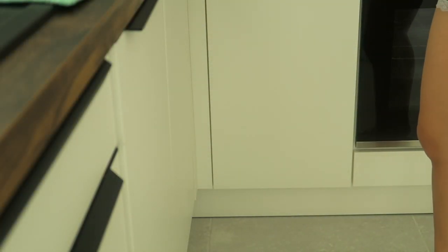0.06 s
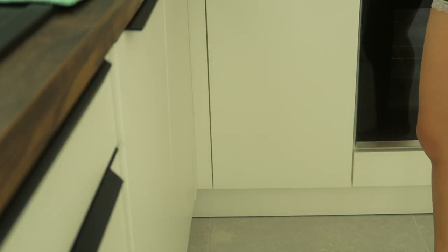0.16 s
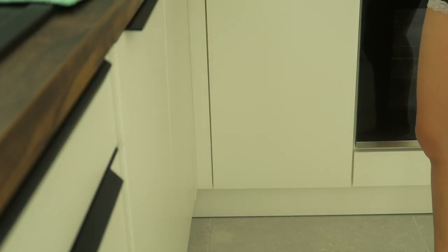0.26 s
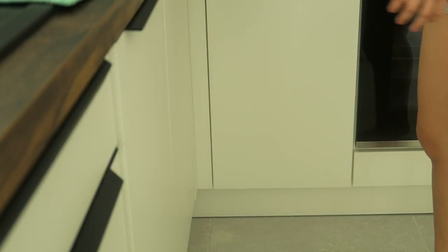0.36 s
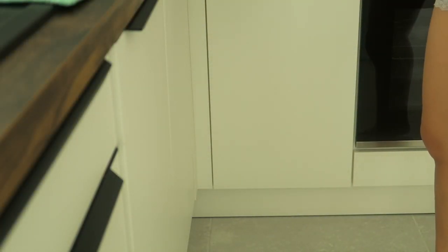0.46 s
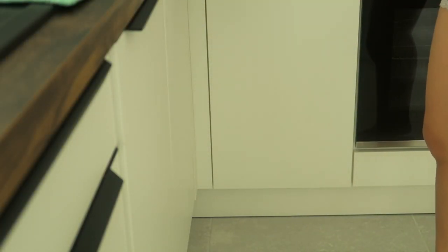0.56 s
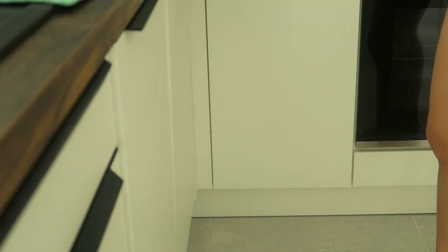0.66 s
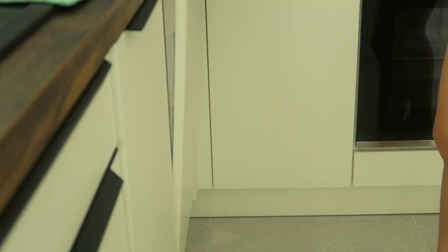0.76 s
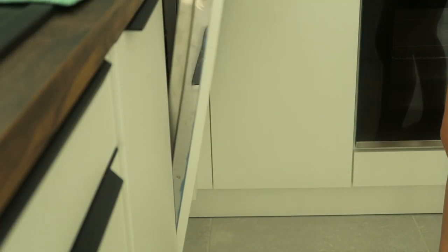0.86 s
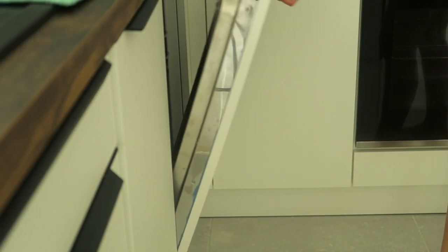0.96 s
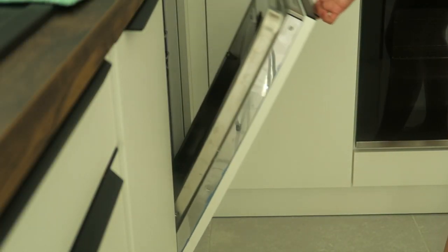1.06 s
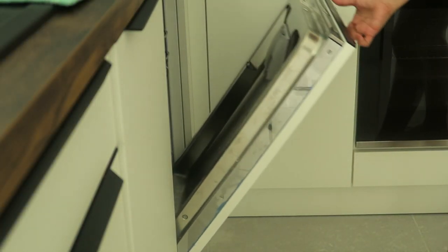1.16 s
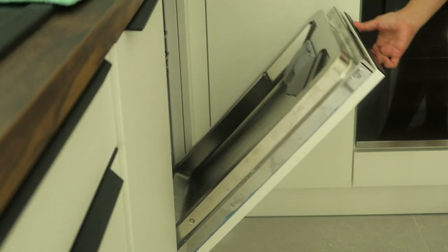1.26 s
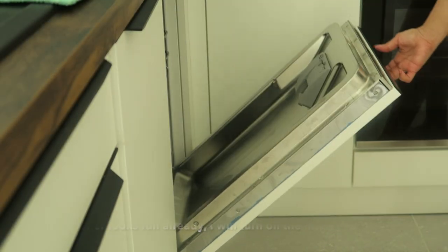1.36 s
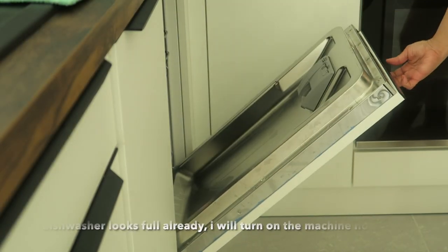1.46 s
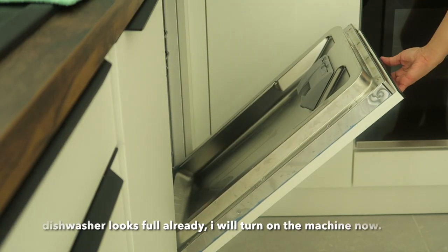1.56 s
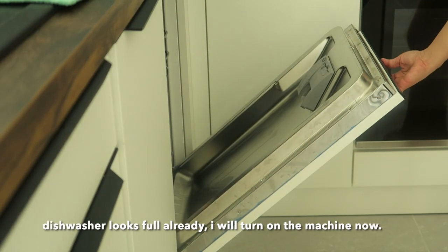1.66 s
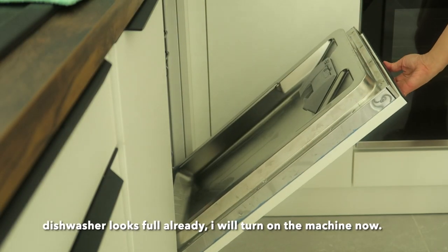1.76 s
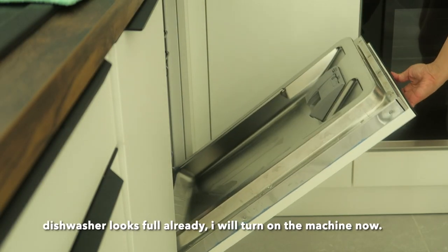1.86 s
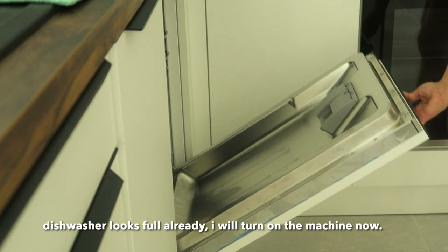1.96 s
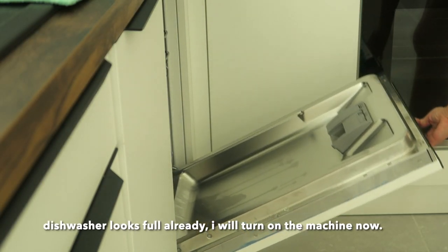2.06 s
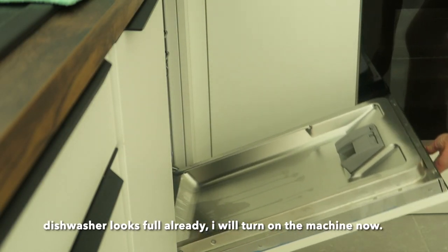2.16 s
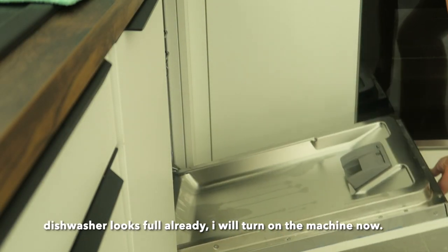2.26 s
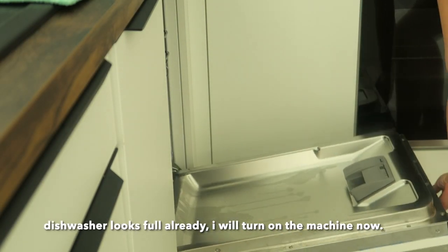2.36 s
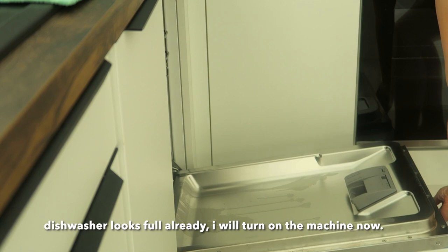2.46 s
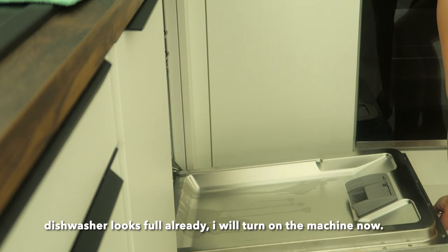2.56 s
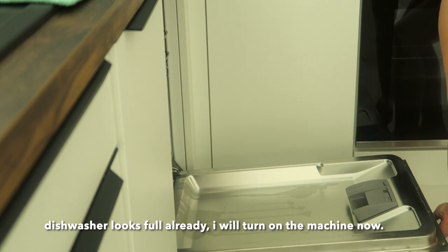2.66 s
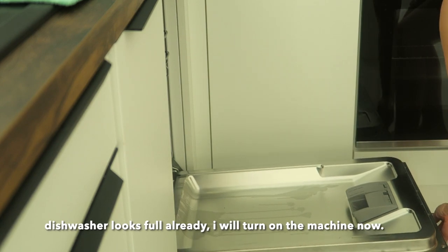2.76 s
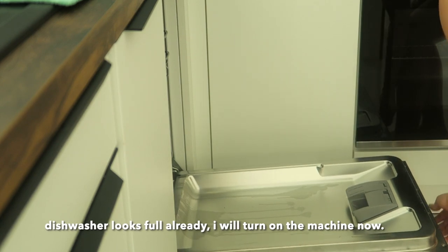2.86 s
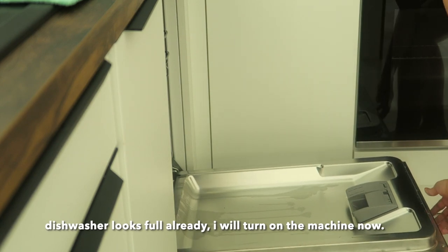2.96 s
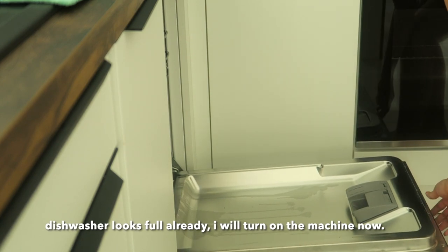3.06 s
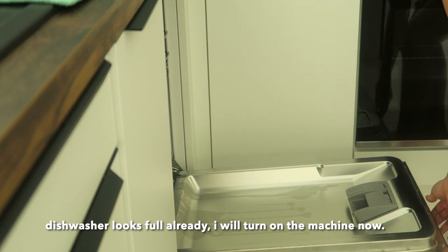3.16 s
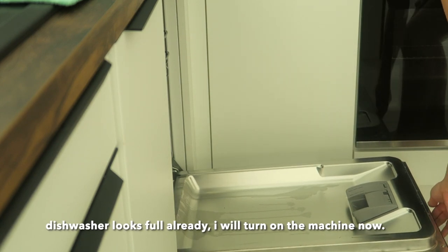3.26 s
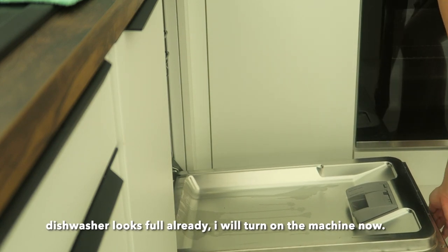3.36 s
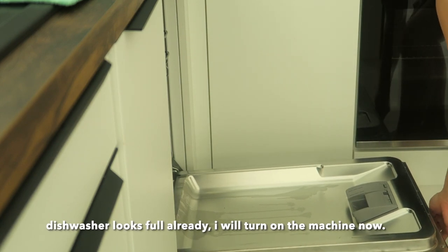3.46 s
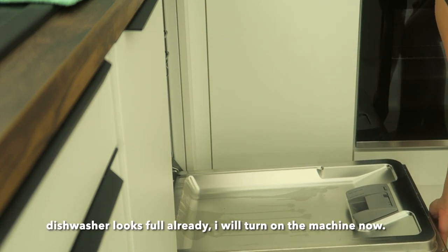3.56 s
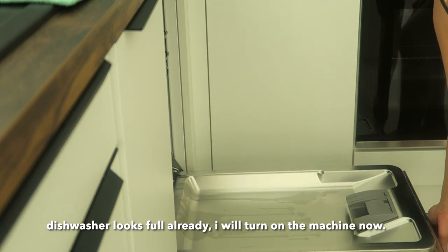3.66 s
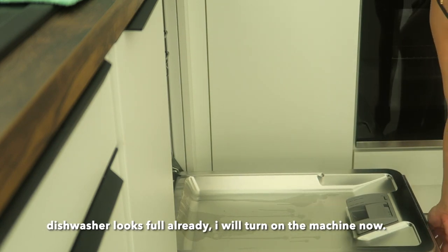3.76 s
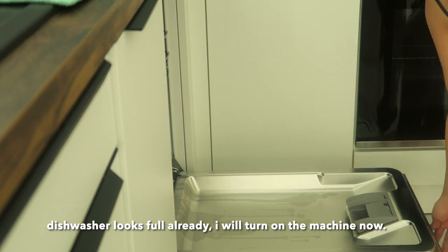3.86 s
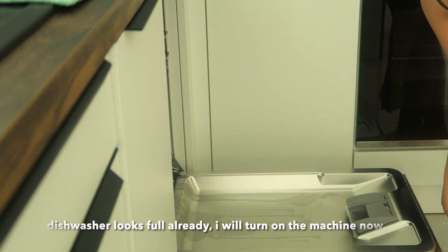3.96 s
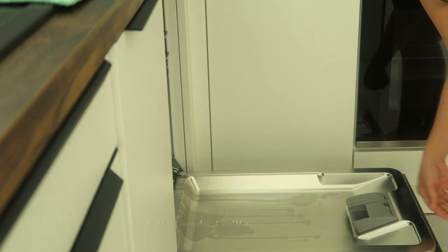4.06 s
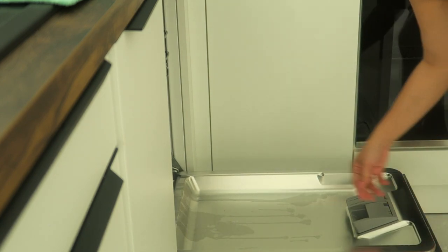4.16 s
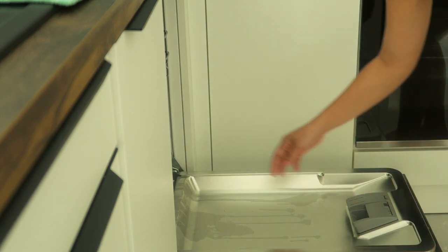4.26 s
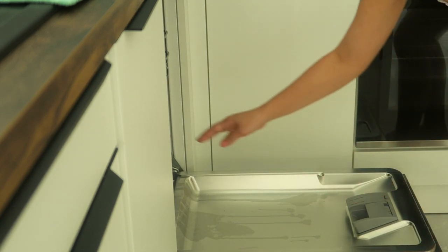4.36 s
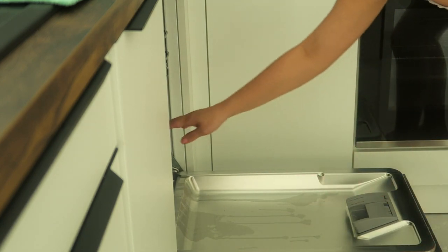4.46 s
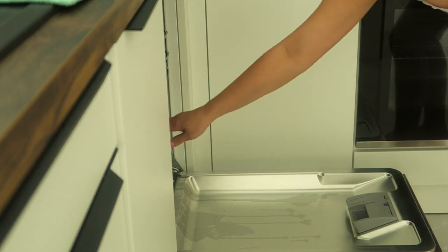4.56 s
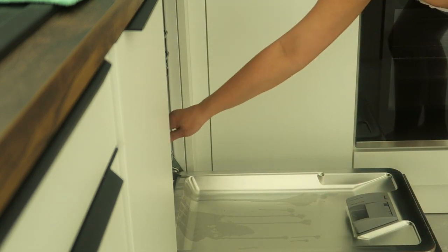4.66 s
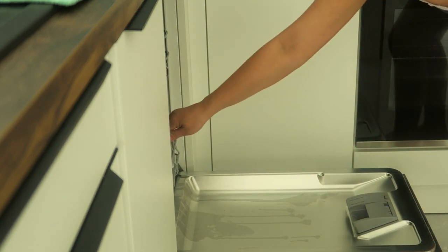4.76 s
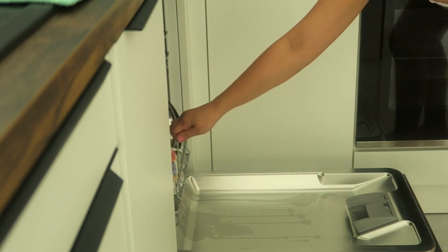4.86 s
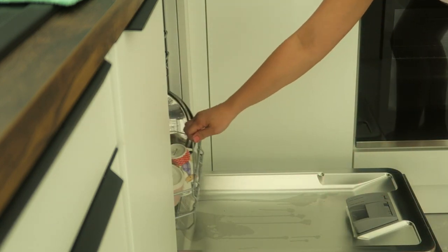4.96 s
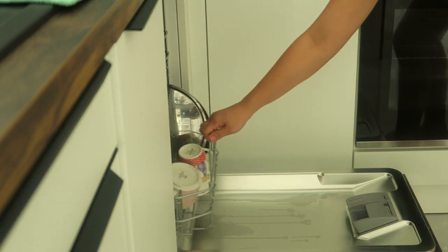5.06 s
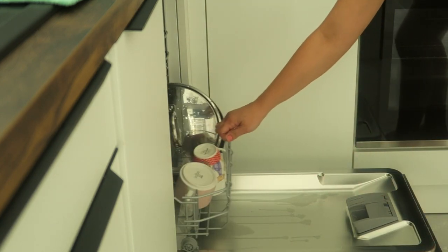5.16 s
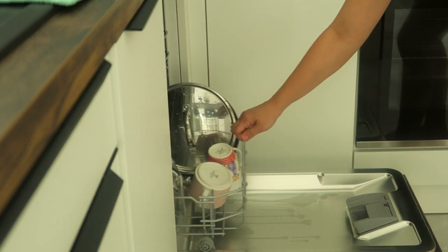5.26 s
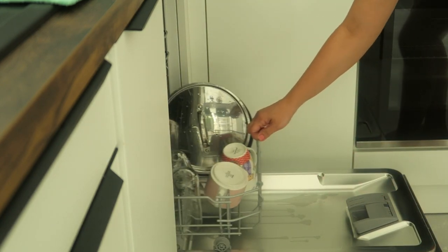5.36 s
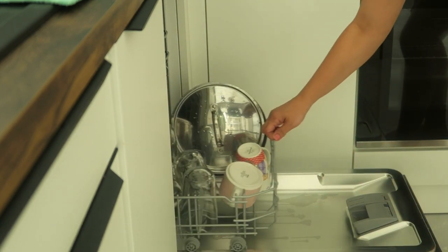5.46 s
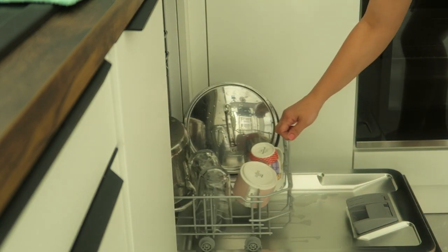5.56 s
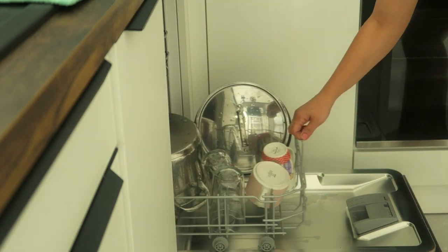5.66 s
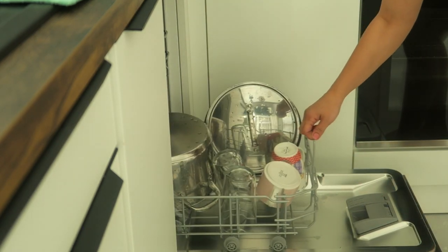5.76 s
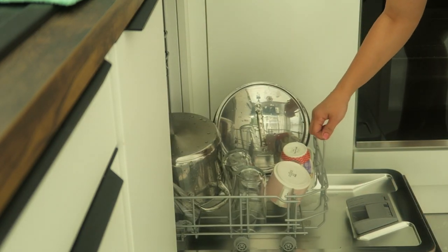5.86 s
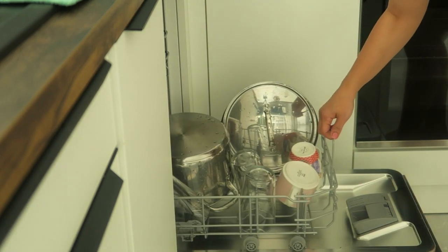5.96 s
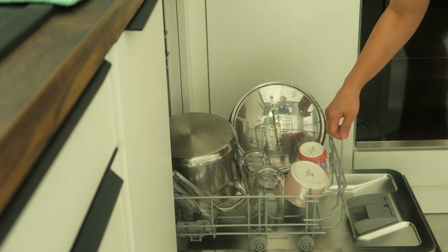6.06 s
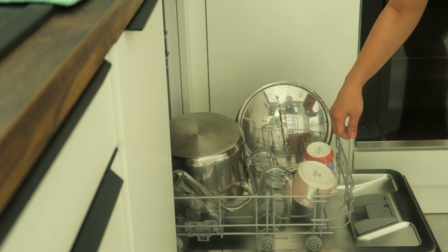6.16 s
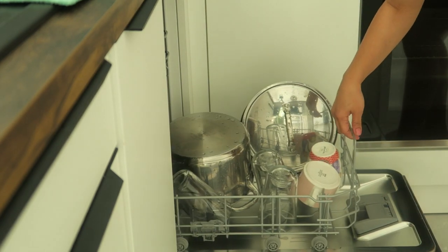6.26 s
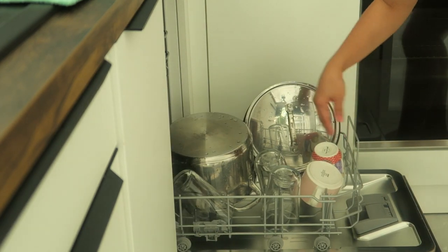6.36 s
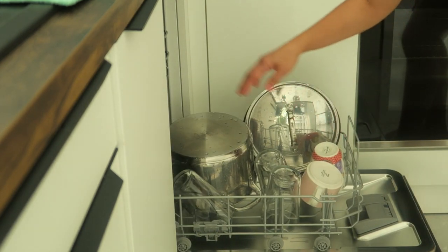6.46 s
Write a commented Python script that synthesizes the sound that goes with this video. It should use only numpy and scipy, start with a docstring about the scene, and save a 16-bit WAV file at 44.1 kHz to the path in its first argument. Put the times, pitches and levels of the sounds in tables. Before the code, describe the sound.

In a quiet kitchen, a knock is followed by a dishwasher door unlatching and swinging down with a rubbing hinge, clacks and faint spring twangs. Small runs of ticking from a camera's focus motor sound right beside the microphone. The door lands with a hollow boom. Then the loaded wire rack rumbles out, and a pot, lid, cups and glasses clatter and clink over a low room hum.

```python
"""A dishwasher is opened in a kitchen. After a first knock the door unlatches and swings down in two stages,
its hinge rubbing and its spring twanging, while a camera's focus drive ticks beside the microphones.
The door drops on its stops and the hollow tub booms. Then the loaded wire rack rolls out over the sill,
and a pot, a lid, cups and glasses knock together and ring in their natural modes.
Throughout, soft swishes come and go and the air of the home hums."""
import sys
import numpy as np
from scipy import signal
from scipy.fft import rfft, irfft, next_fast_len
from scipy.io import wavfile
from scipy.ndimage import map_coordinates

SR = 44100
rng = np.random.default_rng(int(sys.argv[2]) if len(sys.argv) > 2 else 0)


def to_wav(s):
    """Save 16-bit WAV."""
    ch = np.atleast_2d(s).T  # columns
    pcm = np.round(np.clip(ch, -1, 1) * 32767)  # PCM
    wavfile.write(sys.argv[1], SR, pcm.astype(np.int16))


N = 287091
T = np.arange(N) / SR

# rumble of the rack as it rolls out in jerks: t/s, level/dB
RACK_TRAVEL = [(4.55, -69), (4.68, -52), (4.82, -49), (4.92, -37.5), (5.25, -39.5), (5.75, -40.5),
               (6.02, -47.5), (6.13, -33), (6.26, -45.5), (6.51, -46.5)]
# resonances of the hollow tub and door: f/Hz, bandwidth/Hz, gain/dB
TUB_MODES = [(118.4, 45, -5.5), (248.5, 50, -2.5), (369.7, 57, 1), (480, 276, -5.5)]
# resonances of the hinge and rack steel: f/Hz, bandwidth/Hz, gain/dB
STEEL_MODES = [(765, 350, 7), (1630, 660, 8), (1890, 760, 7), (2770, 680, 1.5), (3090, 1040, -4)]


def knocks():
    """Impact excitation: door, stops and wheels strike; the steel clacks, the tub thuds and booms."""
    # t/s, clack level/dB, clack f/Hz, bandwidth over f, thud level/dB, boom level/dB, boom f/Hz, t60/s
    contacts = [(0.067, -34.5, 815, 0.99, -30.5, -57, 110, 0.23), (0.822, -59, 900, 1, -50, -33, 100, 0.17),
                (1.258, -29, 2270, 0.57, -26, -32, 100, 0.056),
                (1.285, -56, 2380, 0.34, -52, -37, 104, 0.62),
                (1.624, -43.5, 2250, 0.88, -46, -74, 110, 0.11),
                (1.78, -48, 590, 0.75, -27.5, -32, 133, 0.14), (3.606, -62, 900, .9, -29.5, -33, 60, 0.11),
                (3.62, -53.5, 990, 0.86, -36, -27, 192, 0.15),
                (3.645, -60.5, 2500, 0.34, -40, -30, 129, 0.42),
                (3.84, -39, 1750, 0.88, -39, -37, 110, 0.046),
                (3.85, -41, 840, 1.14, -31, -39.5, 128, 0.21),
                (4.88, -33, 1340, 0.74, -28.5, -42, 110, 0.19),
                (5.075, -30, 1300, 0.91, -26, -22.5, 109, 0.17),
                (5.084, -23.5, 2530, 1.2, -19.5, -20, 105, 0.23),
                (5.112, -22.5, 1370, 0.84, -27, -26, 64.5, 0.32),
                (5.38, -38, 2300, 1.3, -32, -49, 110, 0.38), (5.65, -39, 1270, 0.5, -37, -42, 115, 0.31),
                (5.701, -32.5, 2360, 0.4, -35.5, -34.5, 111, 0.031),
                (5.739, -53, 1900, 1, -38, -52, 109, 0.043),
                (5.884, -46, 2380, 0.55, -34.5, -58, 110, 0.027),
                (6.053, -35, 1600, .8, -25.5, -37, 65, 0.057),
                (6.068, -30.5, 1340, 0.75, -29, -27, 108, 0.074),
                (6.136, -37.5, 2750, 0.22, -40, -34, 111, 0.1),
                (6.288, -21.5, 2490, 0.43, -33, -64, 110, 0.033),
                (6.396, -47, 1480, .5, -44, -36, 114, 0.31)]
    scatter_db, scatter_per_s, fizz_db = 2.5, 124, -19
    thud_rise_s, longest_t60_s = 0.016, .35
    out, t = np.zeros(N + SR), np.arange(SR // 3) / SR
    skin = lambda f: 1 + 0.036 * band(f, 2700, 250)  # the inner steel skin rattles in one band
    panel = lambda f: skin(f) * lowpass(f, 4000, 1.02) ** 3
    tub = lambda f: resonances(f, TUB_MODES) * 1j * f / (150 + 1j * f) * lowpass(f, 453, 1.3) ** 2
    for s, clack_db, clack_hz, width, thud_db, boom_db, boom_hz, t60 in contacts:
        decay = amp(-60 * t / min(t60, longest_t60_s)) * (1 - np.exp(-t / 0.00055))
        blow = decay * (1 + 0.25 * np.exp(-t / 0.0011))  # the first touch stands out
        clack_noise, fizz_noise, thud_noise, boom_noise = rng.standard_normal((4, len(t)))
        uneven = map_coordinates(clack_noise, [t * scatter_per_s])
        after_blows = amp(scatter_db * uneven * (0.5 - np.exp(-t * scatter_per_s)))
        crack = unit(filtered(clack_noise, lambda f: band(f, clack_hz, width * clack_hz) ** 2))
        clack = filtered(after_blows * blow * crack, panel)
        hiss = unit(filtered(fizz_noise, lambda f: (f / 4000) ** 3 / (1 + (f / 5600) ** 8)))
        fizz = amp(fizz_db) * decay * (1 - np.exp(-t / 0.012)) * hiss
        thud = filtered(thud_noise * decay * (1 - np.exp(-t / thud_rise_s)), tub)
        boom = filtered(boom_noise * blow ** 3, lambda f: band(f, boom_hz, 30) / (1 + 1j * f / 150))
        bass = amp(thud_db) * unit_peak(thud) + amp(boom_db) * unit_peak(boom)
        out[round(s * SR):][:len(t)] += amp(clack_db) * (clack + fizz) + bass
    return out[:N]


def dishes():
    """Coupled vibration: a struck dish rings and wakes its neighbours; rolling rattles the load."""
    # natural modes of each object: f/Hz, level/dB, t60/s
    cup = [(779, 10.5, 0.061), (898, 4.5, 0.13), (2060, 1, 0.085), (2470, 5, 0.17), (2690, -11, 0.18),
           (3180, -7, 0.047)]
    glass = [(1060, 5.5, 0.1), (2670, -1, 0.1), (2770, -2.5, 0.2), (4460, -9, 0.3), (5960, -23, 0.13),
             (7380, -18, 0.19)]
    lid = [(712.4, 9, 0.13), (1261, 3, 0.14), (1380, -4, 0.24), (1491, 0.5, 0.14), (2452, -3, 0.17),
           (3740, -11, 0.064)]
    pot = [(595, -2, 0.18), (963, -1, 0.2), (1320, 1.5, 0.04), (1416, 1.5, 0.22), (2050, -12, 0.26),
           (2343, -6.5, 0.28), (3450, -13, 0.17)]
    spoon = [(5550, 12, 0.15), (5200, 10, .12)]
    tumbler = [(4360, -5, 0.23), (4410, 0, 0.29), (4750, -5, 0.17), (6430, -15.5, 0.14), (7250, -18, 0.1),
               (7310, -16, 0.16), (10950, -15, 0.12), (11500, -22, 0.074), (12350, -17.5, 0.093)]
    rack = [(1133, 1.5, 0.15), (1743, 8.5, 0.072), (2440, -2, 0.08), (3210, -3.5, 0.075)]
    # blows within the load: t/s, object struck, level/dB
    clinks = [(4.881, "rack", -39), (4.896, "rack", -41), (5.084, "pot", -24), (5.086, "lid", -26.5),
              (5.114, "lid", -26), (5.118, "cup", -39), (5.114, "tumbler", -31), (5.155, "lid", -31.5),
              (5.178, "tumbler", -41.5), (5.208, "pot", -40.5), (5.245, "pot", -39), (5.381, "glass", -34),
              (5.405, "glass", -40), (5.423, "glass", -41), (5.533, "glass", -50), (5.654, "pot", -42),
              (5.7, "cup", -41.5), (5.702, "tumbler", -47.5), (5.74, "pot", -48.5), (5.773, "tumbler", -63),
              (5.805, "tumbler", -63), (5.884, "cup", -49.5), (6.055, "rack", -40.5),
              (6.06, "spoon", -62.5), (6.07, "pot", -39), (6.139, "glass", -44), (6.288, "cup", -35.5),
              (6.291, "tumbler", -33.5), (6.302, "cup", -44), (6.32, "glass", -46), (6.343, "cup", -41),
              (6.345, "tumbler", -52), (6.397, "pot", -36.5)]
    # how readily each object rings along or rattles: object, gain/dB
    coupling = {"cup": -13, "tumbler": -24.5, "glass": -13.5, "lid": -10.5, "pot": -9}
    load = dict(cup=cup, glass=glass, lid=lid, pot=pot, spoon=spoon, tumbler=tumbler, rack=rack)
    hard_blow_db = -20  # weaker blows sound duller
    rattles_per_s, rattle_db, spread_db, detune = 16, -5, 3.5, .04
    out, t = np.zeros(N + SR), np.arange(SR * 2 // 5) / SR
    fade = np.clip(20 * (t[-1] - t), 0, 1)
    for s, struck, db in clinks:
        soft_db = max(hard_blow_db - db, 0)
        neighbours = sum(amp(gain_db) * ring(load[name], t, soft_db - gain_db)
                         for name, gain_db in coupling.items()
                         if struck not in (name, "rack"))  # coated wires jolt no neighbour
        out[round(s * SR):][:len(t)] += amp(db) * fade * (ring(load[struck], t, soft_db) + neighbours)
    start = round(RACK_TRAVEL[0][0] * SR)
    shake = envelopes(RACK_TRAVEL)[0][start:]
    for name, gain_db in 2 * list(coupling.items()):  # two of each kind, slightly detuned
        strikes = rng.random(len(shake)) < rattles_per_s / SR
        uneven_db = spread_db * np.clip(rng.standard_normal(len(shake)), -3, 1.5)
        blows = shake * strikes * amp(rattle_db + gain_db + uneven_db)
        tone = fade * ring(load[name], t * (1 + detune * rng.standard_normal()))
        out[start:N] += signal.fftconvolve(blows, tone)[:len(shake)]
    return out[:N]


def rolling_rack():
    """Rolling noise: the wheels drive the open door, the wires scrape and small metal jingles."""
    # resonances of the door lying open: f/Hz, bandwidth/Hz, gain/dB
    door_modes = [(111.7, 30, -1), (240, 26, -1), (438, 167, -5)]
    scrape_db, jingle_db = -6.5, -38.5  # relative to the wheels
    wheels = rumble(door_modes, spread_db=3)
    jingle = unit(filtered(grit(3, 45), lambda f: band(f, 7000, 9000) ** 2))
    scrape = unit(filtered(grit(3.8, 40), steel))
    return envelopes(RACK_TRAVEL)[0] * (wheels + amp(jingle_db) * jingle + amp(scrape_db) * scrape)


def swinging_door():
    """Sliding friction: the hinges force the resonances of the tub and of their own steel."""
    # one list for each stage of the swing: t/s, rumble level/dB, scrape level/dB
    stages = [
        [(0.62, -87, -62), (0.73, -47, -59), (0.85, -49.5, -51.5), (1.05, -46, -50), (1.33, -42, -44.5),
         (1.57, -56, -60), (1.72, -78, -60)],
        [(1.8, -48, -69), (1.97, -51, -56), (2.15, -42.5, -51), (2.4, -47.5, -58.5), (2.9, -63, -97)],
    ]
    bright_hz = 1880  # the hinge rubs brighter than the rack above this
    rumble_gain, scrape_gain = np.sum([envelopes(stage) for stage in stages], axis=0)
    scrape = unit(filtered(grit(1.5, 60), lambda f: steel(f) * (1 + 1j * f / bright_hz)))
    return rumble_gain * rumble(TUB_MODES, spread_db=1.2) + scrape_gain * scrape


def pushed_air():
    """Volume displacement: each lurch of the door or rack makes a deep swell of pressure."""
    # lurches: t/s, level/dB
    lurches = [(0.7, -48.5), (1.09, -59), (1.22, -49), (1.9, -47.5), (5.2, -40.5)]
    rise_db_per_s, fall_db_per_s = 200, 66
    level = sum(swell(s, db, rise_db_per_s, fall_db_per_s) for s, db in lurches)
    return level * unit(filtered(grit(0.78, 9.9), lambda f: band(f, 40, 25) ** 2))


def latch():
    """Sudden release: the door seal lets go with a bright tearing snap that holds for a moment."""
    start_s, hold_s, t60_s = 0.667, .018, 0.031
    tear = unit(filtered(grit(2.3, 400), lambda f: band(f, 4000, 7000) ** 2))
    level = amp(-46.5 - 60 * np.maximum(T - start_s - hold_s, 0) / t60_s) * (T > start_s)
    snap = 1 + 0.76 * np.exp(-np.abs(T - start_s) / 0.0019)
    return level * snap * tear


def spring():
    """Free vibration: the counterweight spring of the door slips and rings faintly."""
    # natural modes of the spring: f/Hz, level/dB, t60/s
    modes = [(2645, 1, 0.14), (2670, -3, 0.18), (3360, -17, 0.11), (4450, -15, .12)]
    # slips: t/s, level/dB
    slips = [(1.29, -46), (1.401, -49), (1.819, -57), (2.133, -47.5)]
    out, t = np.zeros(N + SR), np.arange(SR // 4) / SR
    for s, db in slips:
        out[round(s * SR):][:len(t)] += amp(db) * ring(modes, t)
    return out[:N]


def focus_drive():
    """Structure-borne sound: the casing carries motor steps to two microphones, as mid and side."""
    # runs of the drive: first step t/s, last step t/s, drive level/dB
    runs = [(1.255, 1.39, -48), (1.473, 1.538, -38.5), (2.288, 2.524, -40), (2.626, 2.757, -43),
            (2.791, 2.923, -38), (2.99, 3.19, -40), (3.274, 3.474, -41)]
    step_s = 1 / 30
    # a step, its rebounds and a weak half step: delay t/s, relative strength
    step_blows = [(0, 0.43), (.0045, 0.28), (.007, .5), (.0165, 0.13)]
    blows = np.zeros(N)
    for first, last, db in runs:
        count = round((last - first) / step_s) + 1
        for k, s in enumerate(np.linspace(first, last, count)):
            arch = np.sin(np.pi * (k + 1) / (count + 1)) ** 0.52  # each run swells and fades
            size = amp(db + 3.3 * rng.standard_normal()) * arch
            for delay, share in step_blows:
                blows[round((s + delay - .001) * SR)] = size * share * rng.uniform(0.6, 1)
    casing = lambda modes: filtered(blows, lambda f: band(f, 3450, 4600) * resonances(f, modes))
    return casing([(3130, 150, 25), (4450, 300, 22)]), casing([(3200, 400, 30), (4900, 500, 17)])


def swishes():
    """Friction noise: soft bright rubbing, as of cloth or soles."""
    # strokes: peak t/s, treble level/dB, rise t/s, fall t/s
    strokes = [(0.031, -50, 0.44, 0.12), (1.698, -67.5, 0.36, 0.16), (2.71, -65.5, 0.16, 0.09),
               (3.0, -72.5, 0.67, 0.46), (3.44, -72.5, 0.22, 0.26), (5.61, -64, 0.16, 0.073)]
    # spectrum of the rubbing: f/Hz, relative level/dB
    spectrum = [(200, -20), (500, -8), (1500, -0.5), (3000, -4), (6000, -10), (10000, -20.5), (15500, -22)]
    span_db = 20  # covered in one rise or fall
    level = sum(swell(s, db, span_db / rise, span_db / fall) for s, db, rise, fall in strokes)
    rub = shaped(grit(1.6, 80), spectrum)
    treble = filtered(rub, lambda f: (f > 5500) & (f < 14000))
    return level * rub / np.std(treble)


def room_air():
    """Ambient noise: the hum and hiss of the home, stronger in antiphase at the two microphones."""
    # spectra in phase (mid) and in antiphase (side): f/Hz, relative level/dB
    mid_spectrum = [(15, -27), (25, -5), (156, -4.5), (234, -6.5), (411, -11.5), (650, -13.5),
                    (1540, -17.5), (15600, -42.5)]
    side_spectrum = [(15, -69), (25, -29), (80, -18), (122, -3.5), (275, -0.5), (350, 2.5), (458, -4),
                     (3950, -26.5), (5920, -30.5), (15600, -42.5)]
    mid = amp(-55) * unit(shaped(grit(1.0, 3.52), mid_spectrum))
    side = amp(-50) * unit(shaped(grit(0.86, 3.47), side_spectrum))
    return mid, side


def kitchen(x):
    """Reverberation: mid and side responses of the room, each frequency decaying at its own rate."""
    # reverberation time: f/Hz, t60/s
    decay_times = [(100, 0.91), (500, 0.55), (2500, 0.53), (10000, 0.47)]
    hz, t, spectra = signal.stft(rng.standard_normal((2, SR * 2 // 3)), SR, nperseg=256)
    decay = amp(-60 * t / log_curve(decay_times, hz)[:, None])
    tail = signal.istft(spectra * decay, SR, nperseg=256)[1]
    return signal.fftconvolve(x[None], tail / np.linalg.norm(tail[0]), axes=1)[:, :N]


def ring(modes, t, soft_db=0):
    """Modal superposition: a blow wakes damped sines; chatter against neighbours jitters their phase."""
    spread_db, relative_linewidth, nudge_s, contact_s = 2, .0055, .0005, .0007
    hz, db, t60 = np.transpose(modes)[:, :, None]
    dulling_db = .25 * soft_db * np.maximum(np.log2(hz / 5000), 0)  # soft blows lose treble
    strength = amp(db - dulling_db + spread_db * rng.standard_normal(hz.shape) - 60 * t / t60)
    nudge_rad = np.sqrt(2 * np.pi * relative_linewidth * hz * nudge_s)
    walks = np.cumsum(nudge_rad * rng.standard_normal((len(modes), int(t[-1] / nudge_s) + 2)), axis=1)
    wander = np.array([np.interp(t / nudge_s, np.arange(len(walk)), walk) for walk in walks])
    onset = (1 - np.exp(-t / contact_s)) ** 2
    return onset * np.sum(strength * np.sin(2 * np.pi * hz * t + wander), axis=0)


def rumble(modes, spread_db):
    """Forced vibration: a rough contact drives the low resonances of a body."""
    return unit(filtered(grit(spread_db, 30), lambda f: resonances(f, modes) / (1 + (f / 700) ** 2)))


def steel(f):
    """Frequency response of the hinge and rack steel, with the top rolled off."""
    return resonances(f, STEEL_MODES) / (1 + (f / 4200) ** 4)


def grit(spread_db, per_s):
    """Random amplitude modulation: noise that moves to a new level per_s times a second."""
    knots = np.clip(rng.standard_normal(int(N * per_s / SR) + 4), -3, 1.5)
    return rng.standard_normal(N) * amp(spread_db * np.interp(T * per_s, np.arange(len(knots)), knots))


def resonances(f, modes):
    """Parallel resonators of alternating sign, from rows of f/Hz, bandwidth/Hz, gain/dB."""
    return sum((-1) ** k * amp(db) * band(f, hz, width) for k, (hz, width, db) in enumerate(modes))


def band(f, centre_hz, width_hz):
    """Band-pass response of a damped oscillator."""
    return 1j * f * width_hz / (centre_hz ** 2 - f ** 2 + 1j * f * width_hz)


def lowpass(f, corner_hz, loss):
    """Second-order low-pass response; loss is 1/Q."""
    return 1 / (1 - (f / corner_hz) ** 2 + 1j * loss * f / corner_hz)


def filtered(x, response):
    """Linear filtering: the spectrum of x times a complex response of frequency."""
    size = next_fast_len(x.shape[-1] + SR // 4)
    return irfft(rfft(x, size) * response(np.fft.rfftfreq(size, 1 / SR)), size)[..., :x.shape[-1]]


def shaped(x, spectrum):
    """Zero-phase filtering by rows of f/Hz, gain/dB."""
    return filtered(x, lambda f: amp(log_curve(spectrum, f)))


def log_curve(points, hz):
    """Interpolation of rows of f/Hz, value on a logarithmic frequency axis."""
    f, values = np.transpose(points)
    return np.interp(np.log(hz + 1), np.log(f + 1), values)


def envelopes(rows):
    """One amplitude envelope for each level/dB column after t/s; silence outside the table."""
    times, *levels = np.transpose(rows)
    return [amp(np.interp(T, times, db, -120, -120)) for db in levels]


def swell(s, db, rise_db_per_s, fall_db_per_s):
    """Exponential growth to a peak at time s, then exponential decay."""
    return amp(db - rise_db_per_s * np.maximum(s - T, 0) - fall_db_per_s * np.maximum(T - s, 0))


def amp(db):
    return 10 ** (np.asarray(db) / 20)


def unit(x):
    return x / np.sqrt(np.mean(x ** 2) + 1e-20)


def unit_peak(x):
    return x / np.abs(x).max()


def scene():
    """Mid-side stereo: closely spaced microphones hear the dishwasher's bass alike, its treble apart."""
    # weighting of the side signal: f/Hz, gain/dB
    side_gain = [(60, -53), (200, -18), (700, -19.5), (2400, -24.5), (4400, -8), (8000, -0.5), (15000, -1)]
    side_delay_s = .003
    hits = knocks() + latch() + spring() + dishes()
    motion = swinging_door() + pushed_air() + rolling_rack()
    rub = swishes()
    room_mid, room_side = kitchen(amp(-4.5) * hits + amp(-10.5) * rub)
    motion_side = kitchen(motion)[1]
    delayed = filtered(rub + 0.88 * hits, lambda f: np.exp(-2j * np.pi * f * side_delay_s))
    tick_mid, tick_side = focus_drive()
    air_mid, air_side = room_air()
    mid = hits + motion + rub + room_mid + air_mid + tick_mid
    side = shaped(room_side + motion_side + delayed, side_gain) + air_side + tick_side
    return np.array([mid + side, mid - side])


def record(dry):
    """Band limiting: an ideal low-pass removes the highest treble."""
    top_hz = 15750
    return filtered(dry, lambda f: f < top_hz)


dry = scene()
out = record(dry)
to_wav(out)
```